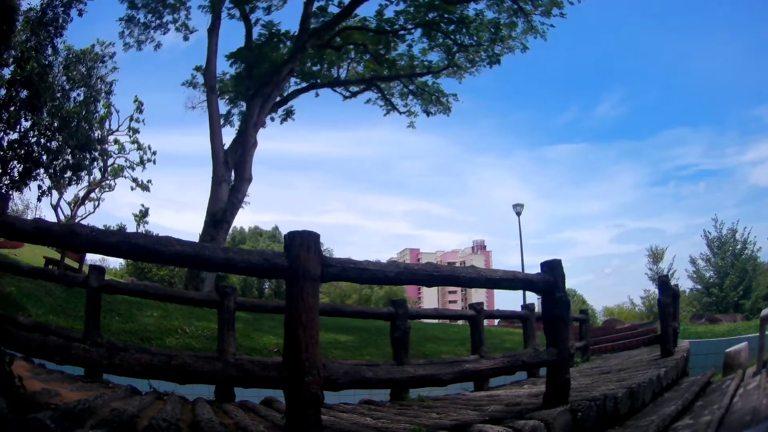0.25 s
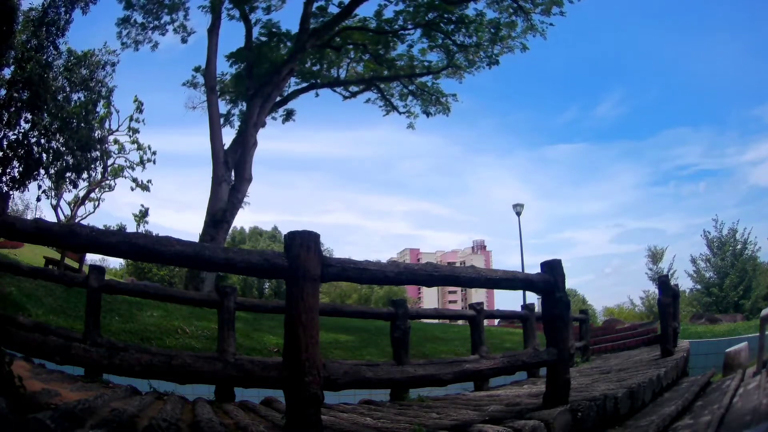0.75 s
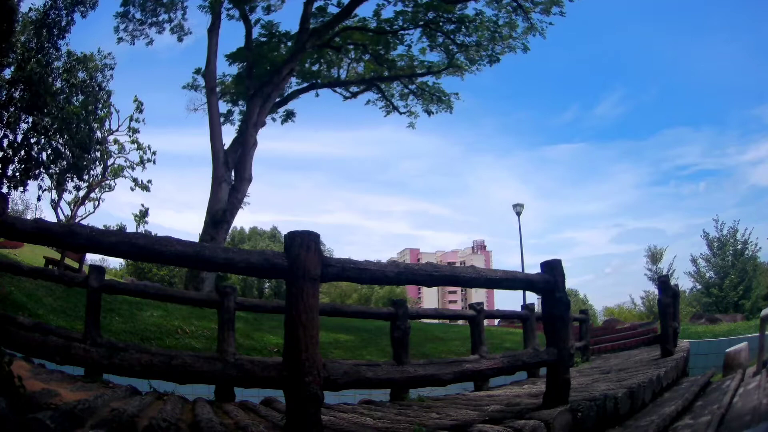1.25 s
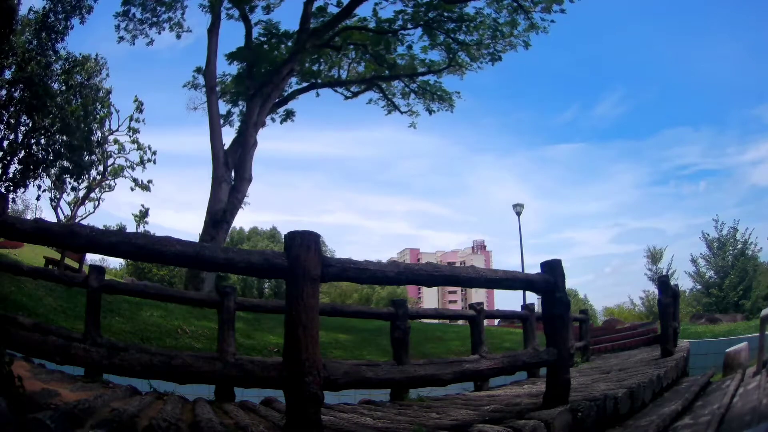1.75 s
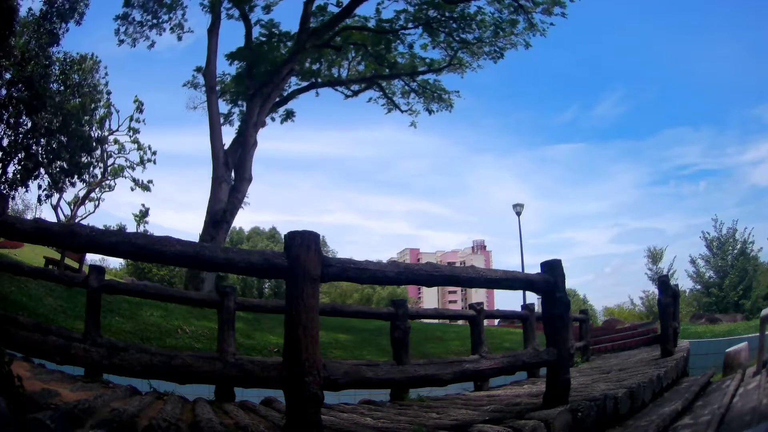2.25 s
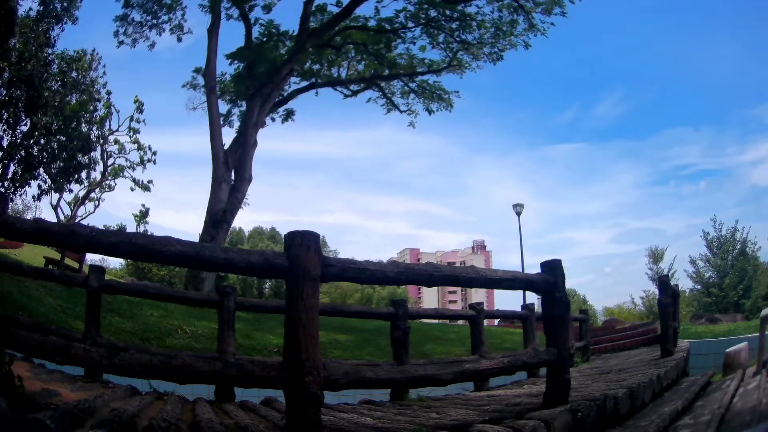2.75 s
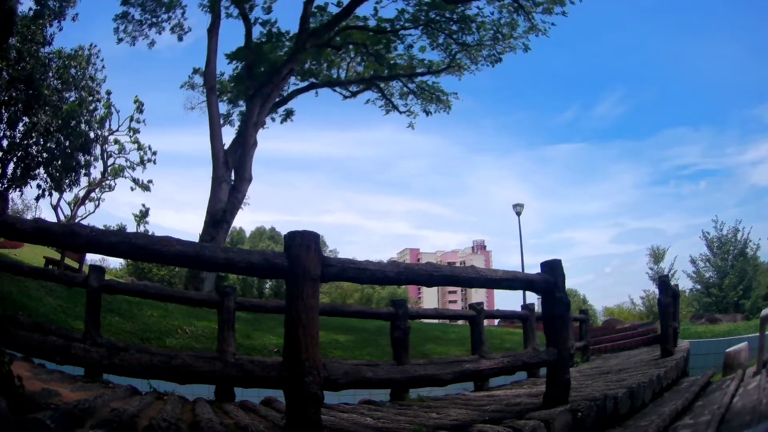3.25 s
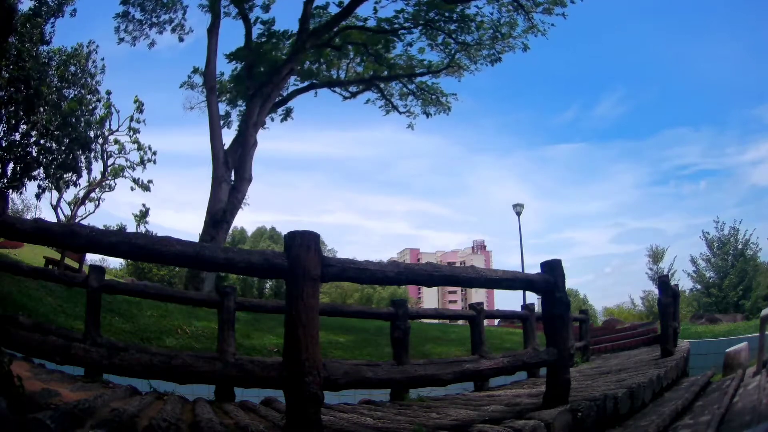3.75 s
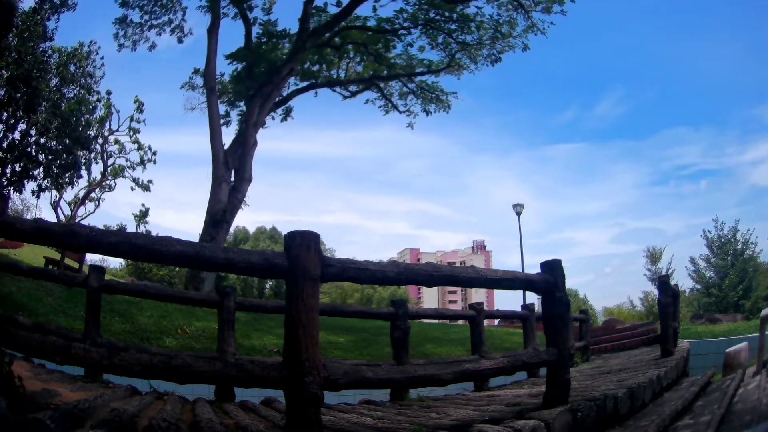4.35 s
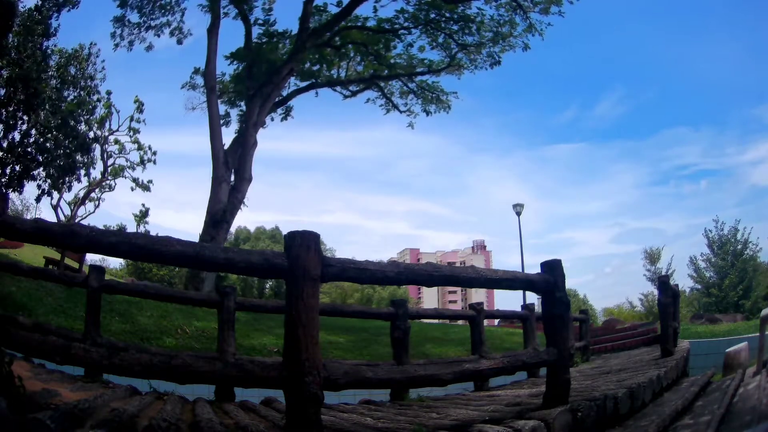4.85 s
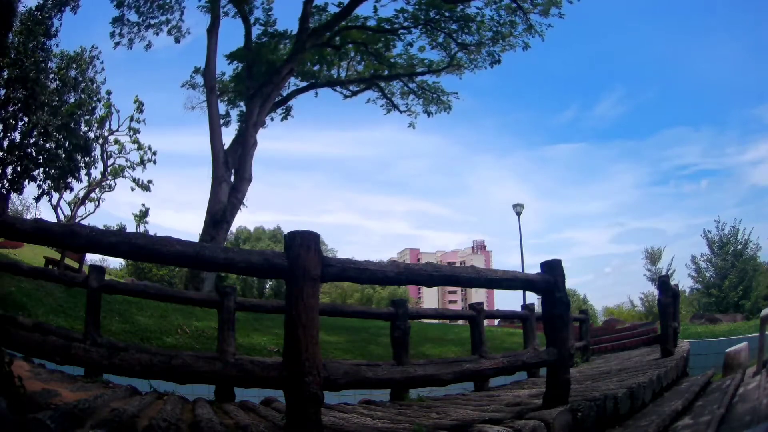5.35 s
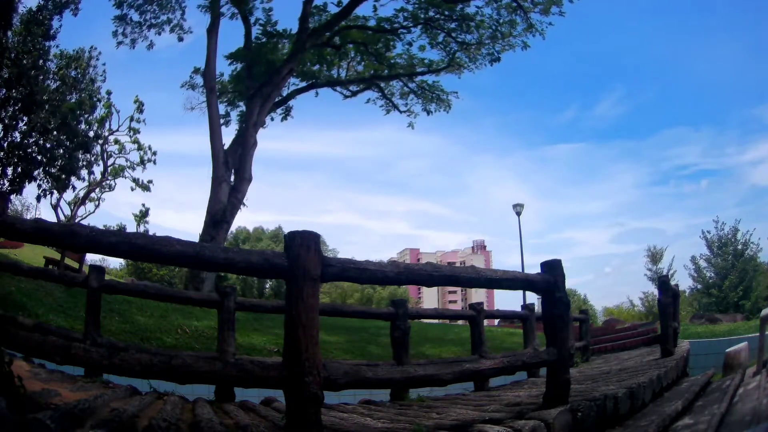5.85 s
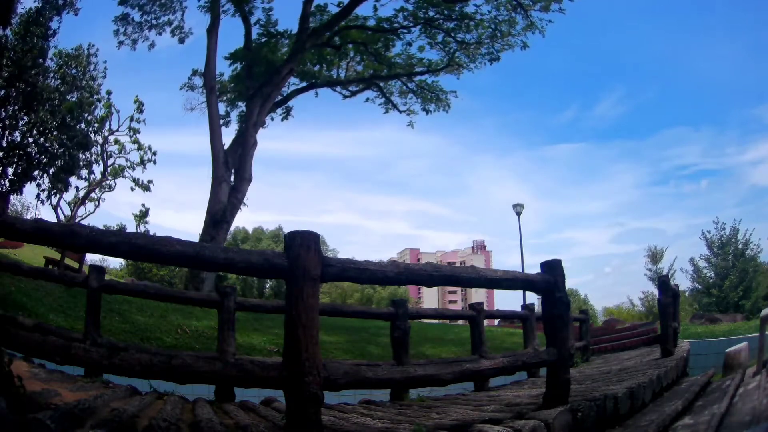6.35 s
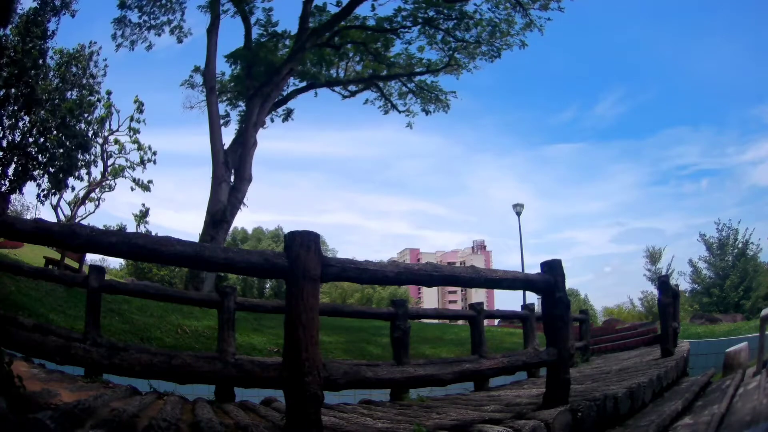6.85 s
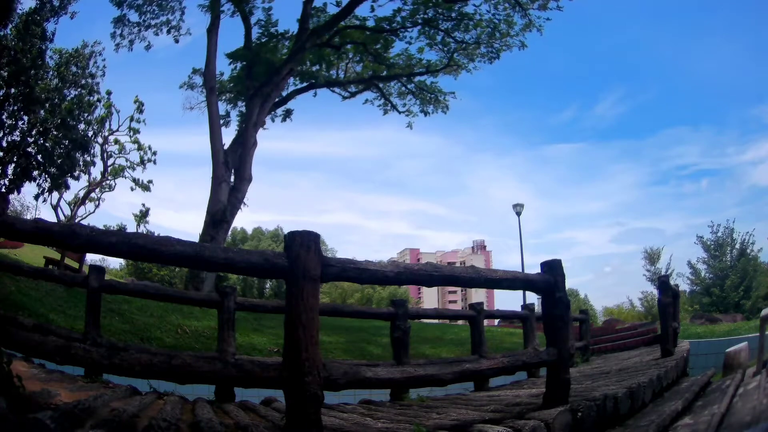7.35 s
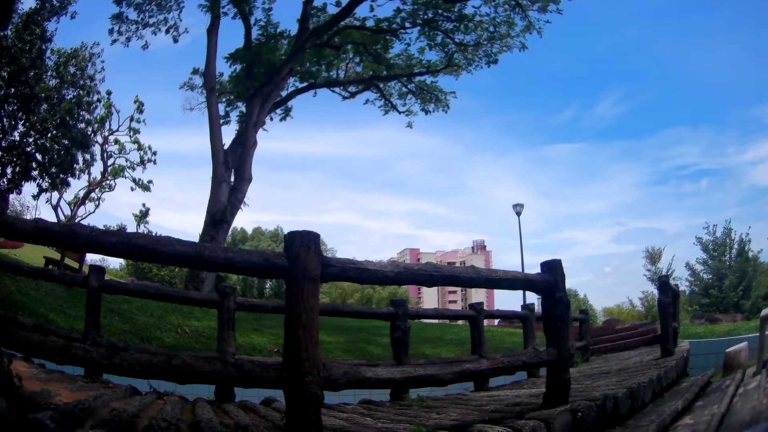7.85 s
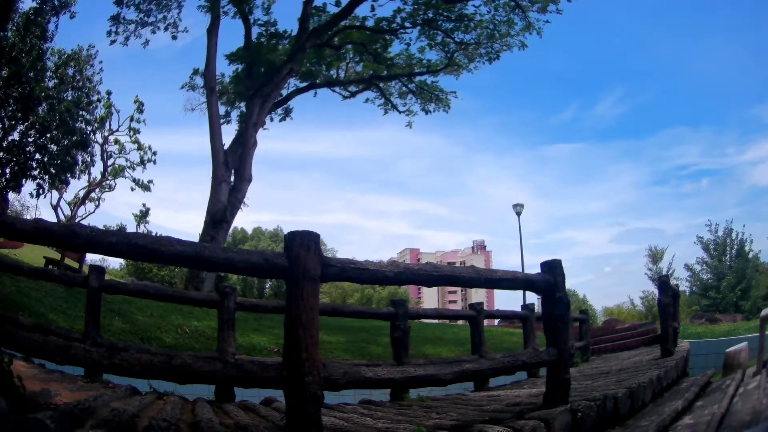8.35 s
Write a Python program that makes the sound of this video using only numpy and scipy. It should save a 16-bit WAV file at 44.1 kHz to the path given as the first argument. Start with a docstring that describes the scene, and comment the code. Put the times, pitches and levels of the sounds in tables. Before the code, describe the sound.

Quiet outdoor air: continuous bright leaf rustle above dull, far traffic noise, the same in both channels. Scattered high bird whistles and tiny quick chirps stay faint, with a slight blur from the trees. A gust brightens the leaves early on; wind flutters the bare capsule with deep rumbles and soft pops, strongest from seven and a half seconds to the end.

```python
"""Breezy open park

One small bare microphone lies near the ground. Far leaves and the town hiss steadily as shaped noise;
near leaves rustle louder and brighter in a gust, and now and then one flicks against another.
Eddies rumble on the capsule as low noise and thump as single pressure dips.
Small birds whistle, peep and chatter faintly from trees around: gliding sines with a short scattered tail."""
import sys
import numpy as np
from scipy import signal
from scipy.fft import rfft, irfft, next_fast_len
from scipy.io import wavfile
from scipy.ndimage import uniform_filter1d

SR = 44100
rng = np.random.default_rng(int(sys.argv[2]) if len(sys.argv) > 2 else 0)


def unload_wav(signal):
    """Save mono or channel-first audio to the path in sys.argv[1] as 16-bit WAV at rate SR, clipped to [-1, 1]."""
    wavfile.write(
        sys.argv[1],
        SR,
        np.round(np.clip(np.atleast_2d(signal).T, -1, 1) * 32767).astype(np.int16),
    )


N = 379260  # samples


def undb(db):
    """Decibels to gain."""
    return 10 ** (np.asarray(db) / 20)


def level(x, db):
    """Scale to an rms level in dB."""
    return x * undb(db) / np.sqrt(np.mean(x ** 2))


def curves(table):
    """The value columns of a table whose first column is time_s, interpolated at every sample."""
    time_s, *columns = np.transpose(table)
    return [np.interp(np.arange(N) / SR, time_s, column) for column in columns]


def walk(rate_hz):
    """Random levels held 1 / rate_hz seconds, then smoothed twice; spread near 1."""
    hold = int(SR / rate_hz)
    steps = np.repeat(rng.standard_normal(N // hold + 1), hold)
    smooth = uniform_filter1d(uniform_filter1d(steps, hold), hold)
    return 1.38 * smooth[:N]


def band(x, low_hz, high_hz):
    """Steep band-pass."""
    return signal.sosfilt(signal.butter(3, [low_hz, high_hz], "band", fs=SR, output="sos"), x)


def coloured(x, colour):
    """Spectrum of x weighted by (pitch_hz, level_db) points, and its frequency axis."""
    size = next_fast_len(N)
    hz = np.maximum(np.arange(size // 2 + 1) * SR / size, 1)
    point_hz, point_db = np.transpose(colour)
    weight = undb(np.interp(np.log(hz), np.log(point_hz), point_db))
    return rfft(x, size) * weight, hz


def shimmer(spectrum, hz, centres_hz, gain_db):
    """Split into overlapping bands half an octave apart, each with its own moving gain."""
    out = 0
    for centre_hz in centres_hz:
        octaves = np.clip(np.log2(hz / centre_hz), -.5, .5)
        share = np.cos(np.pi * octaves) ** 2
        out = out + undb(gain_db(centre_hz)) * irfft(spectrum * share)[:N]
    return out


# Leaves through the take, rising in gusts: time_s, level_db (hiss above 9200 Hz, before tilt and flicker),
# tilt_db_per_octave (about 11 kHz)
LEAF_HISS = [(0.0, -53.5, -1), (1.87, -49, 0), (2.92, -52, -0.5), (5.1, -52.5, -0.5), (6.23, -51, 0.5),
             (8.6, -50.5, 0.5)]
# Spectrum of the leaf hiss: pitch_hz, level_db (per Hz, relative)
LEAF_SPECTRUM = [(710, -20), (1200, -1), (1600, -1.5), (4800, -3.5), (6300, -4.5), (8980, -1),
                 (12000, -11.5), (14500, -17.5), (15500, -26)]


def leaves():
    """Countless leaf contacts merge into hiss; a gust makes it louder and brighter; bands flicker a little."""
    hiss_db, tilt_db = curves(LEAF_HISS)
    contacts = rng.standard_normal(N) * undb(rng.exponential(size=N))
    spectrum, hz = coloured(contacts, LEAF_SPECTRUM)
    spectrum = spectrum / np.std(irfft(spectrum * (hz > 9200)))
    boughs = walk(7)  # swings every band together

    def band_db(centre_hz):
        """Tilt about 11 kHz, plus the shared swing and a flicker of the band's own."""
        return tilt_db * np.log2(centre_hz / 11000) + 0.6 * boughs + .5 * walk(9)

    centres_hz = 600 * 2 ** np.arange(0, 5.6, .5)
    return undb(hiss_db) * shimmer(spectrum, hz, centres_hz, band_db)


# Spectrum of the distant town and far trees: pitch_hz, level_db (per Hz, relative)
TOWN_SPECTRUM = [(53, -8), (90, -14), (129, 0.5), (270, -5), (458, -4.5), (526, -7.5), (756, -7.5),
                 (1060, -7.5), (1600, -22.5), (2500, -18), (3250, -24), (5500, -120)]
TOWN_DB = -46  # rms at the capsule


def town():
    """Distant traffic and far trees: smooth low noise whose bands drift slowly."""
    spectrum, hz = coloured(rng.standard_normal(N), TOWN_SPECTRUM)
    centres_hz = 30 * 2 ** np.arange(0, 7.1, .5)
    drifting = shimmer(spectrum, hz, centres_hz, lambda centre_hz: 0.24 * walk(1.6))
    return level(drifting, TOWN_DB)


# Wind at the bare capsule: time_s, level_db (deep rumble, before puffs)
WIND_LEVEL = [(0, -48.5), (1.2, -47), (2.2, -40.5), (2.55, -46.5), (3.05, -41), (3.25, -39), (3.85, -43),
              (4.2, -37), (4.5, -45.5), (4.9, -43), (5.5, -47), (6.25, -41.5), (6.55, -41), (6.9, -37.5),
              (7.4, -38.5), (7.48, -33), (7.95, -34), (8.06, -26.5), (8.35, -29.5), (8.6, -37)]
PUFF_DB, PUFF_PER_S = 2.5, 9  # quick random swings of the deep rumble
CALM_DB, UPPER_CALM_DB = -42.5, -48.5  # wind level that counts as calm; upper rumble up to there
UPPER_FOLLOWS = 0.56  # dB of upper rumble per dB of wind above calm


def rumble():
    """Turbulence past the capsule: big slow eddies below, lumpy smaller ones above."""
    wind_db, = curves(WIND_LEVEL)
    deep_db = wind_db + PUFF_DB * walk(PUFF_PER_S)
    upper_db = UPPER_CALM_DB + UPPER_FOLLOWS * np.maximum(wind_db - CALM_DB, 0)
    deep = band(rng.standard_normal(N), 16.5, 55.2)
    deep = deep + undb(0.5) * band(rng.standard_normal(N), 11.8, 32.2)
    lumps = rng.standard_normal(N) * undb(2.46 * walk(28))
    upper = band(lumps, 51.0, 117.4) + undb(-8) * band(lumps, 123.7, 202.5)
    return undb(deep_db) * level(deep, 0) + undb(upper_db) * level(upper, 0)


# Clear whistles: start_s, length_s, first_hz, middle_hz, last_hz, level_db, crest (loudest at 0-1 of length)
CLEAR_WHISTLES = [(0.03, 0.21, 8450, 8250, 8030, -40, 0.57), (1.302, 0.064, 4250, 4230, 4370, -50, .35),
                  (1.548, 0.084, 3630, 3700, 3770, -51, 0.3), (1.59, 0.23, 6750, 6660, 6640, -57, .6),
                  (1.745, 0.17, 4060, 4030, 3980, -47.5, 0.67), (1.818, 0.096, 3650, 3620, 3560, -52, .5),
                  (1.915, 0.11, 4700, 4660, 4520, -49, 0.6), (2.685, 0.15, 3520, 3130, 3100, -45, .25),
                  (2.693, .0075, 6200, 6080, 6000, -37.5, .55), (3.513, .013, 6400, 5400, 4650, -45, .6),
                  (4.181, 0.11, 3710, 3700, 3620, -48, .37), (4.94, 0.087, 3390, 3200, 3140, -54, 0.4),
                  (5.364, 0.05, 3640, 3830, 3880, -49, 0.5), (5.384, 0.13, 4680, 4600, 4660, -44.5, .55),
                  (6.38, 0.12, 4670, 4650, 4400, -46.5, .45), (7.55, 0.22, 7560, 7530, 7400, -54, .3),
                  (8.438, 0.059, 3700, 3690, 3650, -46.5, .3), (8.492, 0.11, 3800, 3250, 3020, -52, .5)]
WHISTLE_WARBLE_HZ = 22.2  # spread of random pitch wander, whistles and peeps
# Short peeps: start_s, pitch_hz, level_db
SHORT_PEEPS = [(0.525, 2650, -51), (0.801, 7540, -48), (1.078, 3250, -49), (1.196, 3250, -50),
               (2.119, 7520, -49), (2.19, 2360, -49), (3.91, 4360, -48), (3.964, 2260, -49),
               (4.535, 5020, -50), (5.669, 7490, -48), (5.814, 3090, -49), (5.993, 8040, -50),
               (6.174, 3320, -48.5), (6.737, 3400, -50), (7.18, 3550, -48.5), (7.213, 4580, -53),
               (7.285, 4470, -47), (7.46, 3490, -49), (7.523, 7540, -50), (7.799, 5950, -52)]
PEEP_S, PEEP_FALL = 0.034, .008  # length; share of pitch lost from start to middle and again to the end
FAR_PEEPS, FAR_PEEP_DB, FAR_PEEP_HZ = 24, -55, (2460, 7700)  # count, level, pitch range; random times
# Hoarse chatter: start_s, length_s, first_hz, last_hz, level_db, warble_hz (spread of pitch wander)
HOARSE_CHATTER = [(0.871, 0.045, 5500, 4650, -45, 330), (1.121, 0.1, 3780, 4180, -46.5, 290),
                  (1.21, 0.05, 4700, 5100, -44, 220), (1.259, 0.031, 4850, 4400, -46, 220),
                  (1.343, 0.048, 2700, 2740, -43, 150), (2.657, 0.016, 5300, 4200, -47, 150),
                  (4.367, 0.04, 3450, 3150, -45, 170), (4.399, 0.14, 3900, 4150, -50, 250),
                  (6.197, 0.15, 4250, 4000, -47, 560)]
# One bird's flourish, note by note: delay_s, length_s, first_hz, middle_hz, last_hz,
# level_db (relative to the flourish)
FLOURISH_NOTES = [(0, 0.017, 5150, 5430, 5250, -3.5), (.01, 0.0124, 5300, 4550, 3900, -8),
                  (0.011, .03, 8900, 6980, 9600, -1), (.032, 0.039, 3940, 4790, 5200, -2.5),
                  (0.066, .045, 5150, 5100, 5050, -10)]
# When that flourish is sung: start_s, level_db
FLOURISH_STARTS = [(3.41, -40.5), (6.239, -40.5)]
FLOURISH_WARBLE_HZ = 90  # spread of random pitch wander


def notes():
    """Every bird note: the whistle columns, then warble_hz."""
    when, pitch = rng.random((FAR_PEEPS, 2)).T
    far_s = when * (N / SR - .1)
    far_hz = undb(np.interp(pitch, (0, 1), 20 * np.log10(FAR_PEEP_HZ)))  # even in octaves
    far = list(zip(far_s, far_hz, [FAR_PEEP_DB] * FAR_PEEPS))
    peeps = [(s, PEEP_S, hz * (1 + PEEP_FALL), hz, hz * (1 - PEEP_FALL), db, .5)
             for s, hz, db in SHORT_PEEPS + far]
    clear = [row + (WHISTLE_WARBLE_HZ,) for row in CLEAR_WHISTLES + peeps]
    hoarse = [(s, length_s, first, (first + last) / 2, last, db, .5, warble_hz)
              for s, length_s, first, last, db, warble_hz in HOARSE_CHATTER]
    flourishes = [(s + delay_s, *shape, db + note_db, .5, FLOURISH_WARBLE_HZ)
                  for s, db in FLOURISH_STARTS
                  for delay_s, *shape, note_db in FLOURISH_NOTES]
    return clear + hoarse + flourishes


TREES_DB, TREES_T60_S = -9, .3  # scattered sound: level against the direct sound, time to fall 60 dB


def birds():
    """Near-sine notes on bent glides, some hoarse; moving air makes them flutter, trunks and leaves smear them."""
    direct = np.zeros(N + SR)
    rasp, flutter = walk(700), undb(2.0 * walk(110))
    for s, length_s, first, middle, last, db, crest, warble_hz in notes():
        start = int(s * SR)
        span = slice(start, min(start + int(length_s * SR), N))
        u = np.linspace(0, 1, span.stop - start)
        glide_hz = np.polyval(np.polyfit([0, .5, 1], [first, middle, last], 2), u)
        phase = 2 * np.pi * np.cumsum(glide_hz + warble_hz * rasp[span]) / SR
        rise = u ** (np.log(.5) / np.log(np.clip(crest, .1, .9)))  # 0.5 at the crest
        swell = np.sin(np.pi * rise) ** 0.56 * level(flutter[span], db)
        direct[span] += np.sqrt(2) * swell * np.sin(phase)
    t = np.arange(int(.4 * SR)) / SR
    scatter = rng.standard_normal(len(t)) * undb(-60 * t / TREES_T60_S) * (t > .006)
    smeared = signal.fftconvolve(direct, scatter / np.linalg.norm(scatter))
    return direct[:N] + undb(TREES_DB) * smeared[:N]


# Single eddies that suck at the capsule: time_s (deepest), level_db (peak), width_ms (twice onset to deepest)
MARKED_EDDIES = [(2.245, -28, 8.2), (3.217, -26, 7.2), (3.279, -25, 9.4), (3.431, -30, 3.6),
                 (4.102, -14, 3), (4.21, -24.5, 3.7), (4.216, -25.5, 3.6), (4.876, -29.5, 6.7),
                 (5.084, -25, 4.5), (6.337, -28, 4.2), (7.303, -24, 5.1), (7.515, -26.5, 4.8),
                 (7.548, -21, 4.3), (7.635, -20, 8.3), (7.748, -23, 5.4), (7.82, -20, 5.7),
                 (8.088, -20.5, 12), (8.212, -21, 6.3), (8.351, -26.5, 4.4), (8.396, -25, 7.7)]
SMALL_EDDIES, SMALL_EDDY_MS = 30, (5.7, 4.4)  # count; limits of the random widths
SMALL_EDDY_DB, SMALL_EDDY_FOLLOWS = -35, 0.59  # peak at the calm wind level, dB per dB of wind


def eddies():
    """The marked eddies, and small ones at random that grow with the wind."""
    when, wide = rng.random((SMALL_EDDIES, 2)).T
    s = .05 + when * (N / SR - .1)
    wind_db = np.interp(s, *np.transpose(WIND_LEVEL))
    db = SMALL_EDDY_DB + SMALL_EDDY_FOLLOWS * (wind_db - CALM_DB)
    return MARKED_EDDIES + list(zip(s, db, np.interp(wide, (0, 1), SMALL_EDDY_MS)))


def buffets():
    """Each eddy is a sudden drop of pressure, then a broad weak rebound as the air refills."""
    out = np.zeros(N + SR)
    for s, db, width_ms in eddies():
        u = np.arange(int(.06 * SR)) / SR / (width_ms / 1000)  # time in widths
        start = int((s - width_ms / 2000) * SR)
        drop = (2 * u) ** 3 * np.exp(3 - 6 * u)  # 1 at half a width
        rebound = .2 * np.exp(-((u - 2.3) / 1.2) ** 2) * np.minimum(u, 1)
        out[start:start + len(u)] += undb(db) * (rebound - drop)
    return out[:N]


# A near leaf flicks against another: time_s (middle), level_db (6 dB above the rms at the middle),
# centre_hz, length_ms (between the 1/e points)
LEAF_FLICKS = [(1.862, -34, 8400, 5), (2.08, -39, 8300, 30), (5.412, -38, 9300, 5.5)]


def flicks():
    """Short soft puffs of papery noise: band-passed noise under a bell-shaped swell."""
    out, t = 0, np.arange(N) / SR
    for s, db, centre_hz, length_ms in LEAF_FLICKS:
        paper = level(band(rng.standard_normal(N), 0.87 * centre_hz, 1.37 * centre_hz), db)
        swell = np.exp(-((t - s) * 2000 / length_ms) ** 2)
        out = out + paper * swell / 2
    return out


def scene():
    """One capsule feeds both channels."""
    mono = leaves() + town() + rumble() + birds() + buffets() + flicks()
    return np.array([mono, mono])


CAPSULE_HZ, TOP_HZ = 25.5, 15620  # low corner of the capsule, top of the recorder


def record(dry):
    """The capsule vents the slowest pressure changes; the recorder cuts the top."""
    vented = signal.sosfilt(signal.butter(1, CAPSULE_HZ, "high", fs=SR, output="sos"), dry)
    return signal.sosfilt(signal.ellip(12, .2, 80, TOP_HZ, fs=SR, output="sos"), vented)


dry = scene()
out = record(dry)
unload_wav(out)
```